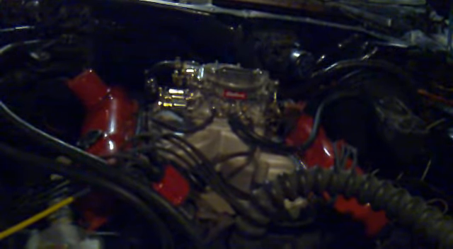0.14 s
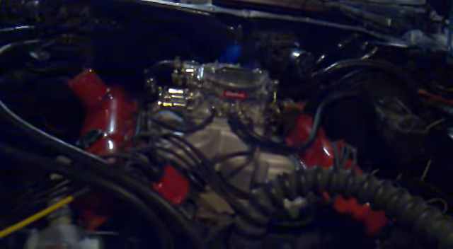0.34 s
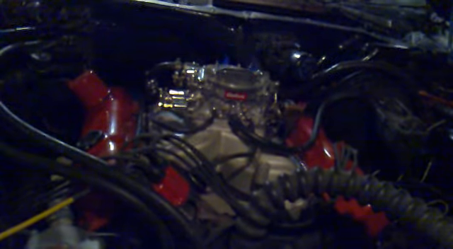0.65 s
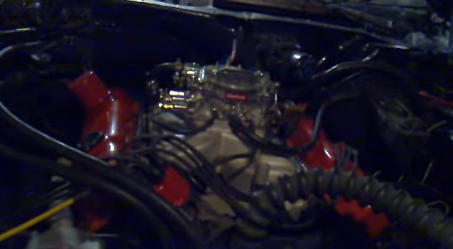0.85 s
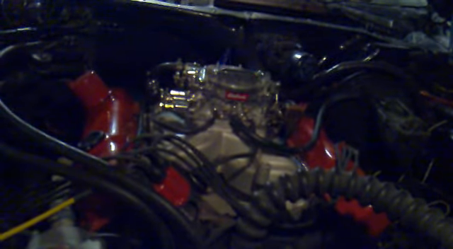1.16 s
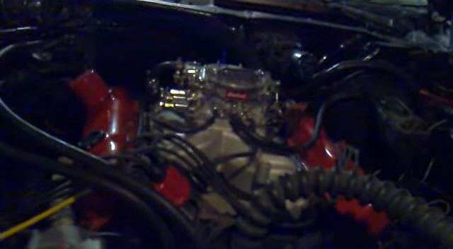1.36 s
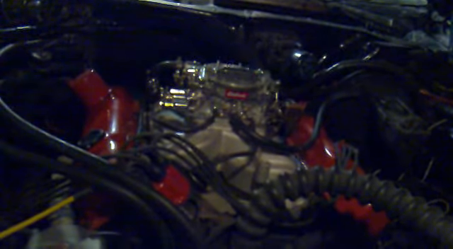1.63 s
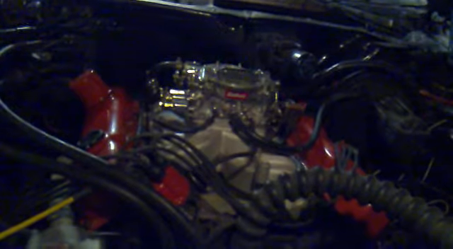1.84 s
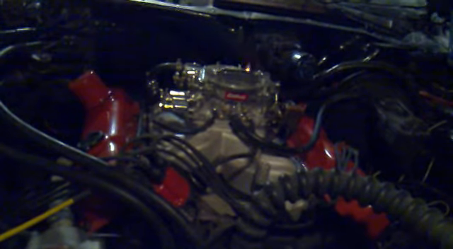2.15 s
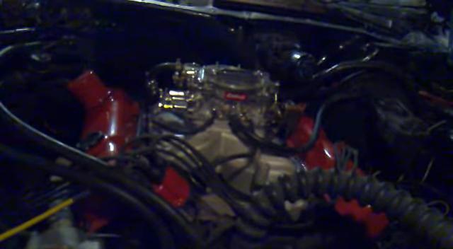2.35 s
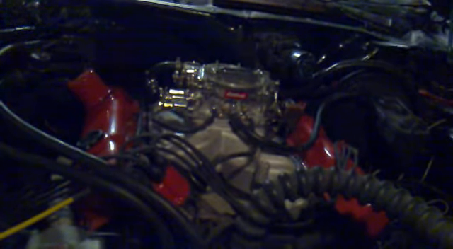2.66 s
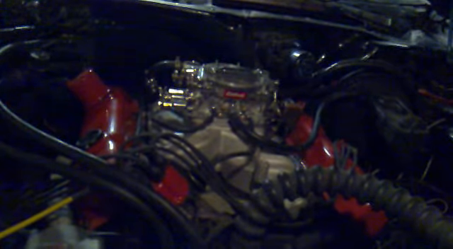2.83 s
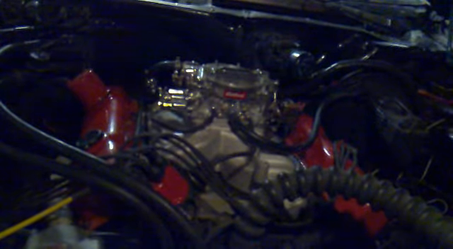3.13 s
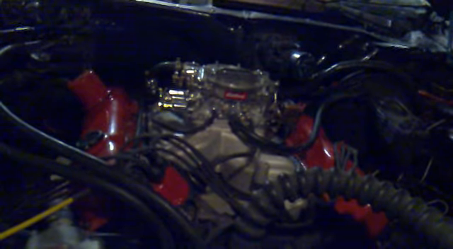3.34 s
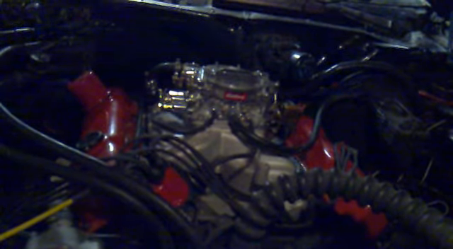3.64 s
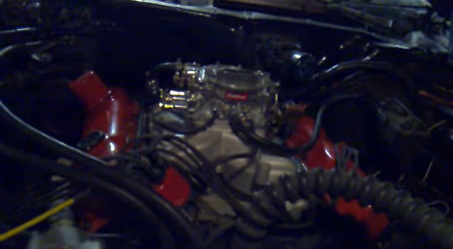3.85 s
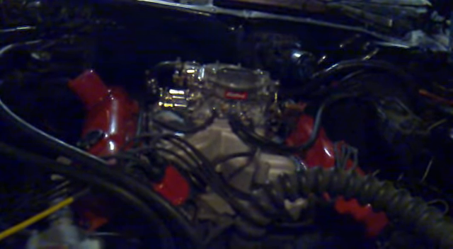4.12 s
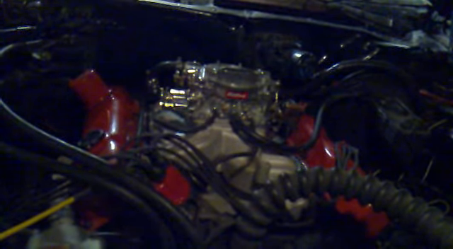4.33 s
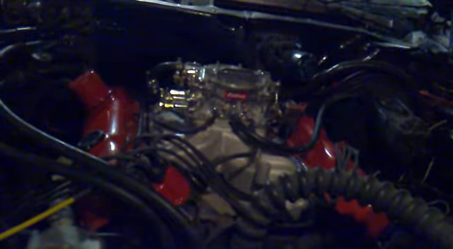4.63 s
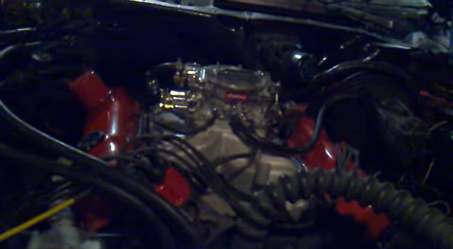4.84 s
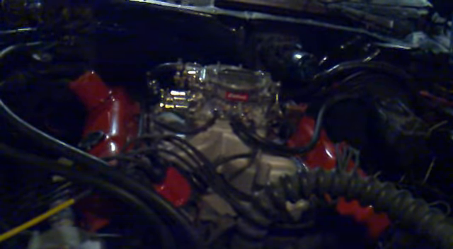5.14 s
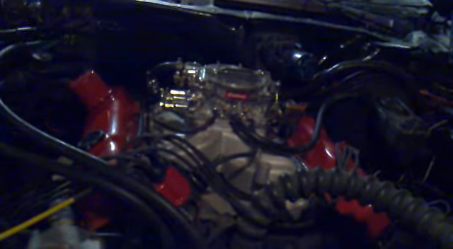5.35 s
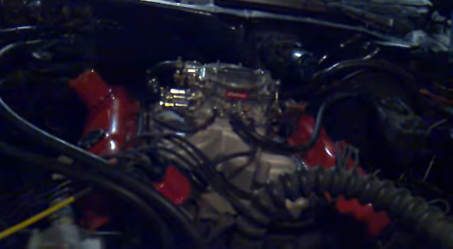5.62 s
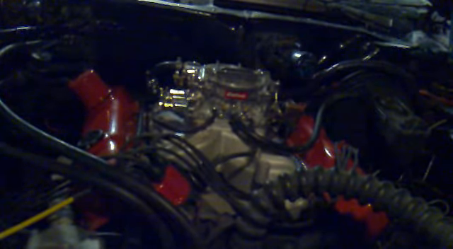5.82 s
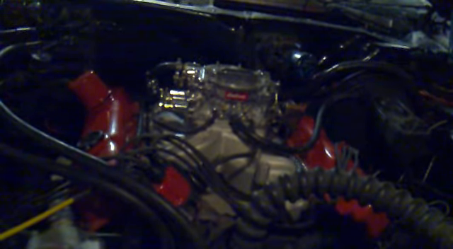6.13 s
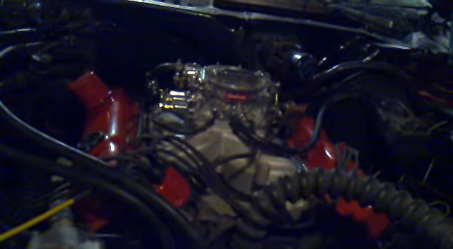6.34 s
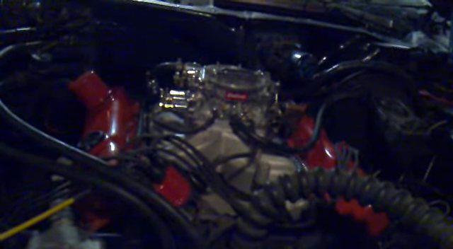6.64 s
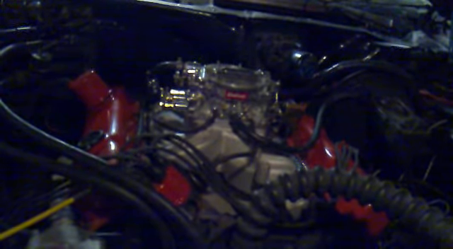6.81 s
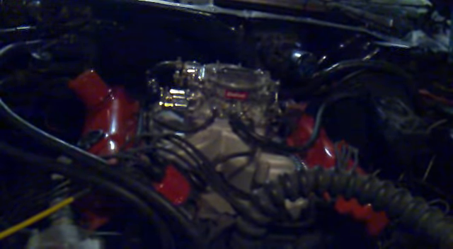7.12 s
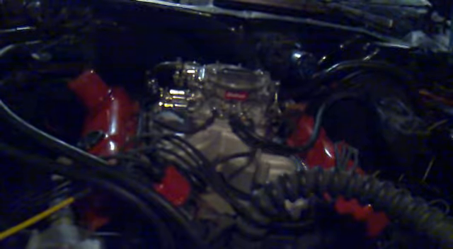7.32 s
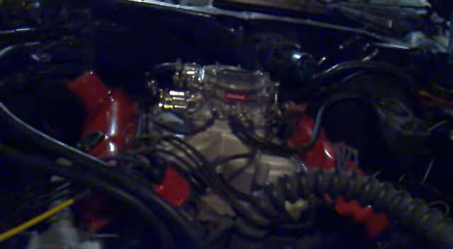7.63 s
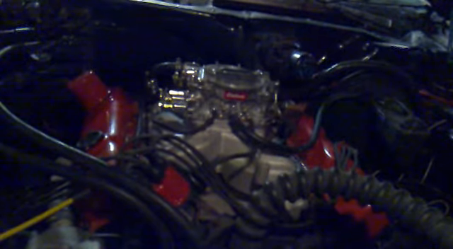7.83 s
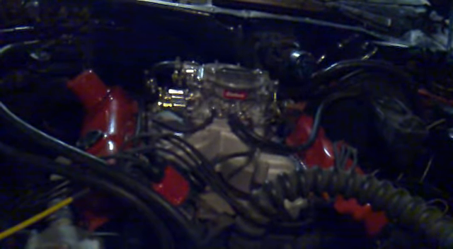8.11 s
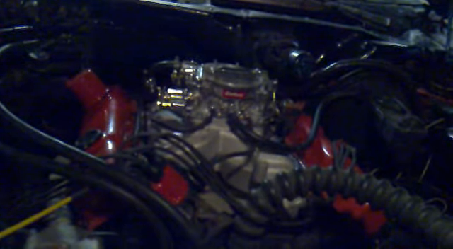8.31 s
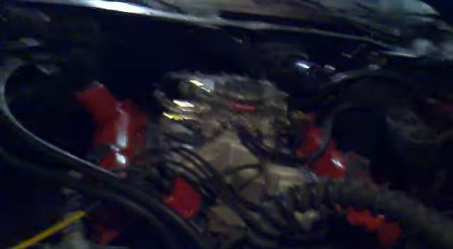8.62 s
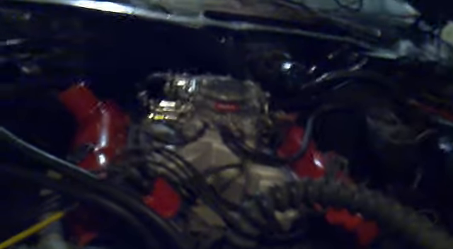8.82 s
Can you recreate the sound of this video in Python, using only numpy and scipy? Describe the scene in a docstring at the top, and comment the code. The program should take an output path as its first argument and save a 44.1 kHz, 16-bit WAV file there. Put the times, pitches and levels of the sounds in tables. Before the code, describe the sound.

A big engine that will not start spits soft fiery puffs and pops, one huge backfire whoosh at two seconds, then weaker hisses and handling clicks.

```python
"""Fuel burning back through the carburetor of a big engine that will not start, in a closed garage.
Puffs and one large whoosh are turbulent noise in bands; ignitions are resonant noise bursts, and
intake air columns sing as narrow-band noise. Pressure jumps thump the room's low standing waves.
At the end a hand shifts on the microphone's plastic case, exciting its damped modes."""
import sys
import numpy as np
from scipy import signal
from scipy.fft import rfft, irfft, next_fast_len
from scipy.io import wavfile
from scipy.ndimage import uniform_filter1d

SR = 44100
rng = np.random.default_rng(int(sys.argv[2]) if len(sys.argv) > 2 else 0)


def waveform_to_disk(signal):
    """Save audio, clipped to [-1, 1], as 16-bit WAV at the path in sys.argv[1]."""
    frames = np.transpose(np.atleast_2d(signal))
    scaled = np.clip(frames, -1, 1) * 32767
    samples = np.round(scaled).astype(np.int16)
    wavfile.write(sys.argv[1], SR, samples)


N = 395577
TIME = np.arange(N) / SR   # s

# puffs of burning gas: start_s, rise_s, hold_s, fade_db_per_s, hiss_db,
# then levels over the hiss: roar_db, sizzle_db, rumble_db, deep_rumble_db
GAS_PUFFS = [(0.001, 0.00089, 0.0059, 250, -54.5, 4.5, -10, 5, -12),
             (0.031, 0.028, 0.086, 122, -67.5, 15.5, -17, 6, 8),
             (0.22, 0.051, .005, 180, -56, 2.5, -11, -13, -17),
             (0.39, 0.047, 0.023, 153, -46.5, -1.5, -6, -9, -25.5),
             (0.556, 0.013, 0.031, 180, -50, -2, -6.5, -14.5, -20),
             (0.625, 0.031, 0.041, 193, -52.5, -7, -6, -29, -15),
             (0.793, .02, 0.043, 128, -59.5, 1.5, -8, -12, -25),
             (1.211, 0.052, 0.022, 170, -58.5, 1, -13, -8, -20),
             (1.37, 0.019, .01, 180, -61, -5, -10, -14, -6),
             (1.414, 0.023, 0.028, 250, -54.5, -3, -4, 9.5, 11),
             (1.574, 0.025, 0.047, 92, -65.5, 3, 1, -12, 0),
             (1.831, 0.049, .005, 240, -54, -5, -11, -27, -18),
             (1.913, 0.044, 0.023, 220, -63, -3, -6, -20, -7),
             (2.021, .017, .02, 100, -33, 0.1, -5.5, -11.5, -16),
             (2.03, 0.037, .02, 149.5, -19, -1, -10.5, -12.5, -16.5),
             (2.085, .025, .02, 300, -19.5, -8.5, -0.53, -10, -12),
             (2.088, 0.03, 0.04, 204, -17.5, 3.5, -9, 1.24, -0.5),
             (2.321, 0.029, .12, 71, -60.5, 1, -0.5, -1, 6),
             (2.536, 0.018, 0.091, 163, -56, -8.5, -3, -12, -5.5),
             (2.954, 0.078, .01, 150, -51, -3, -3, -12.5, -8),
             (3.036, 0.099, 0.018, 140.5, -46, -5, -2, -25, -19.5),
             (3.234, 0.084, 0.048, 190, -57, -4, -2, -13.5, -11),
             (3.692, 0.043, 0.24, 150, -67.5, 0.5, -3.5, -14, -25),
             (3.967, 0.023, 0.017, 122, -32, -11.5, -2.5, -29.5, -40.5),
             (3.994, 0.028, 0.064, 243.5, -29, -14, -5, -32.5, -39.5),
             (4.673, 0.025, 0.1, 200, -69, -4.5, 1, -9.5, -18),
             (4.79, 0.024, 0.11, 150, -60, -8.5, 0.5, -13, -25.5),
             (4.856, 0.08, 0.026, 191, -55.5, -20.5, -3.5, -27.5, -33),
             (5.355, 0.047, 0.023, 152.5, -52, 1, -4, -16, -30),
             (5.855, 0.032, 0.048, 151, -53.5, -10, 1.5, -21, -27),
             (5.916, 0.021, 0.0078, 302, -44.5, -0.5, -6, -21, -21.5),
             (5.969, 0.016, 0.069, 220, -51, -14, -1.5, -23, -33),
             (6.385, 0.03, 0.027, 171, -64.5, -5, -9.5, -31, -29.5),
             (6.494, 0.018, 0.071, 98.5, -67.5, -11, -6.5, -22, -24.5),
             (6.604, 0.051, .005, 151, -67.5, -12, 2, -21.5, -12),
             (6.705, 0.041, 0.0087, 215, -48, 1.5, 0.5, -4.5, -19),
             (6.821, 0.028, 0.0096, 221, -58, -1, -7.5, -11, -17.5),
             (7.077, 0.04, 0.12, 150, -70.5, -2, -2, -20, -18.5),
             (7.266, 0.036, .005, 281, -61.5, -4.5, -1.5, -30, -35),
             (7.531, 0.026, 0.053, 200, -55, -4, -5, -17, -35.5),
             (7.598, 0.03, 0.0043, 269, -45, -3.5, -8, -26, -39.5)]
RISE_DB = 31   # a puff climbs this far during its rise
ROAR_PACE, SIZZLE_PACE = 0.9, 1.05   # fading speed of each range as a share of the hiss's
RUMBLE_PACE, DEEP_PACE = 0.58, 0.49   # the bass lingers
# small flame that keeps burning between puffs: time_s, hiss_db, rumble_db, deep_rumble_db
STANDING_FLAME = [(0, -61, -67, -50.5), (.39, -65.5, -71, -74), (.78, -72, -87, -78),
                  (1.0, -80, -74.5, -82), (1.2, -75.5, -85, -74), (1.5, -67.5, -79, -60),
                  (2.0, -69, -80, -74.5), (2.65, -66, -81, -70.5), (2.85, -76, -78, -85.5),
                  (3.1, -71.5, -76, -62), (3.55, -73, -85.5, -94.5), (4.4, -75, -85, -97),
                  (5.3, -76, -89, -94), (6.2, -75.5, -88, -94.5), (7.0, -77.5, -88, -87.5),
                  (7.8, -81.5, -98, -98.5), (8.1, -82.5, -92, -91), (8.4, -90, -94, -84)]
FLAME_ROAR_DB, FLAME_SIZZLE_DB = -1.9, -6.5   # over its hiss
# relative spectra of the three ranges of turbulent flow: frequency_hz, density_db (per Hz)
ROAR_SPECTRUM = [(150, -21), (220, -6), (320, -1.5), (450, -2.5), (650, -4), (900, -10.5), (1300, -18)]
HISS_SPECTRUM = [(600, -7), (950, -1), (1350, 3), (2000, 0.5), (3200, 0), (4500, -5.5), (6000, -24.5)]
SIZZLE_SPECTRUM = [(3500, -17.5), (4800, -0.5), (6500, -1.5), (8000, -5.5), (11000, -10.5), (16000, -19.5)]
# low standing waves of the garage: frequency_hz, level_db, t60_s
STANDING_WAVES = [(28.2, -9.5, 1), (44.32, -8.5, 0.33), (74.58, -3, 0.89), (83, 2.5, 0.17), (115, -3, 0.45),
                  (151.6, -4, 0.48), (197, -4, 0.26)]
GARAGE_T60_S, GARAGE_DB, WALL_CUT_HZ = 0.39, -22.5, 5100   # loop decay without wall loss, echo, corner
# relative spectrum of room tone and microphone hiss: frequency_hz, density_db (per Hz)
FLOOR_SPECTRUM = [(15, -44.5), (25, -4.5), (108, -5.5), (134, -14.5), (200, -10), (326, -7.5), (1190, -10),
                  (1650, -11.5), (2610, -12), (16000, -15)]
FLOOR_DB = -69.5   # rms
# pressure jumps in the manifold: centre_s, peak_db, length_s
PRESSURE_JUMPS = [(0.056, -44, 0.018), (1.4434, -36.5, .012), (1.4537, -31.5, .012), (1.515, -47, 0.013),
                  (2.126, -10, 0.0094), (2.15, -10.5, .010), (2.161, -11.5, 0.012), (2.202, -21, 0.0098),
                  (6.73, -48, 0.013), (6.739, -44, 0.01), (6.772, -43.5, 0.012)]
BOOM_DB, ROOM_RING_DB = -21.5, -66   # drive of the two strongest standing waves, and of all of them
# air columns in the intake that sing while gas passes:
# start_s, length_s, pitch_hz, width_hz (of each of two passes), level_db
AIR_COLUMNS = [(0.085, 0.24, 288, 110, -56), (0.23, 0.077, 438, 23, -51.5), (0.443, 0.064, 1950, 440, -44),
               (0.81, 0.073, 637, 24, -52.5), (2.068, 0.023, 318, 80, -20), (2.131, 0.019, 332, 43, -4),
               (2.156, .025, 292, 90, -4), (2.088, 0.048, 3240, 400, -47), (3.273, 0.09, 2984, 260, -60),
               (3.99, 0.15, 3325, 26.4, -32.5), (4.046, 0.068, 3310, 10, -32), (4.107, 0.1, 3284, 14, -51),
               (4.002, 0.04, 2063, 49, -35), (4.049, 0.14, 1258, 98, -43), (4.904, 0.08, 1995, 280, -60),
               (5.352, 0.028, 499, 94, -49), (6.74, 0.082, 737, 116, -45.5),
               (7.606, 0.073, 1375, 305, -46.5), (5.856, 0.024, 994, 530, -55.5),
               (8.134, .05, 1599, 140, -72.5)]
# sudden ignitions: start_s, level_db (before a common trim), centre_hz, t60_s,
# width (share of centre, first pass), crack_db (over level_db)
IGNITIONS = [(0.419, -36.5, 424, 0.062, 0.99, 3), (0.575, -34, 400, 0.47, 1, -19),
             (0.814, -41.5, 634, 0.12, 0.63, -23), (1.276, -31.5, 2800, 0.22, 0.63, -14),
             (1.434, -40, 2250, 0.22, 0.34, -22), (1.869, -47, 301, 0.12, 0.7, -14),
             (2.034, -15.5, 595, 0.54, 0.55, -5.5), (2.116, 1, 312, 0.14, 0.4, -18),
             (2.564, -38, 845, 0.18, 0.24, -12), (2.614, -48, 396, 0.097, 0.85, -2.5),
             (3.032, -32, 1100, 0.16, 0.4, -17), (3.149, -34.5, 650, 0.36, 0.51, -11),
             (3.264, -38, 283.3, 0.15, 0.41, -14), (3.988, -21.5, 3420, 0.17, 0.25, -5.5),
             (4.699, -49, 609, 0.12, 0.82, -9), (4.799, -37.5, 358, 0.11, 0.29, -13.5),
             (5.361, -38.5, 502, 0.14, 0.79, -4), (5.395, -33, 746, 0.089, 0.39, -12),
             (5.86, -37.5, 674, 0.2, 0.56, -16), (5.941, -23, 2280, 0.21, 0.53, -14.5),
             (6.148, -43.5, 315, 0.13, 0.77, -9), (6.399, -52, 955, 0.095, 0.58, -14.5),
             (6.718, -37.5, 402, 0.15, 0.76, -3), (7.089, -46.5, 750, 0.14, 0.4, -17.5),
             (7.289, -53.5, 446, 0.13, 0.86, -11), (7.555, -42, 2710, 0.1, 0.43, -15),
             (7.628, -27.5, 1450, 0.21, 0.56, -20)]
# fingers on the case: start_s, level_db (before a common trim), centre_hz, fall_db_per_octave
FINGER_TOUCHES = [(8.591, -42, 3190, 12), (8.611, -48, 664, 16.5), (8.6122, -46, 6040, 9.5),
                  (8.648, -45.5, 897, 8), (8.7108, -30.5, 2010, 24.5), (8.71, -31.5, 4460, 11),
                  (8.7212, -36.5, 1886, 8.5), (8.828, -42.5, 5800, 16), (8.8572, -22.5, 3490, 10),
                  (8.8579, -22.5, 8150, 20), (8.8692, -47, 895, 0.5), (8.8729, -46, 700, 4.5),
                  (8.892, -50, 2520, 4.5), (8.8959, -36, 2180, 10.5), (8.897, -34.5, 600, 15),
                  (8.9195, -37.5, 6400, 17), (8.92, -39, 1760, 11.5)]
# modes of the plastic case: frequency_hz, level_db, t60_s
SHELL_MODES = [(602, -2.5, 0.02), (1663, 0, 0.01), (2010, -1.5, 0.008), (2930, 5, 0.0043), (3870, -2, 0.01),
               (4970, 2.5, 0.0038), (6300, -1, 0.0056), (7520, 5.5, 0.0041), (10170, 14.5, 0.0029)]
# the hand jolts the microphone: centre_s, level_db (before the envelope), period_s, direction (+1 or -1)
JOLTS = [(8.726, -58.5, 0.028, 1), (8.899, -59, 0.013, -1)]
# skin slides on the case: start_s, length_s, level_db
SKIN_RUBS = [(8.738, .05, -68), (8.845, 0.034, -60), (8.89, 0.054, -64.5)]
CEILING, OFFSET, CUTOFF_HZ = 0.71, -0.0005, 15750   # overload level, shift off zero, top of the band


def from_db(db):
    """Decibel law: 20 dB is a factor of ten in amplitude."""
    return 10 ** (np.asarray(db) / 20)


def rms_one(x):
    """Normalization to unit root-mean-square amplitude."""
    return x / np.sqrt(np.mean(x ** 2) + 1e-20)


def drift(rate_hz):
    """Low-pass random process: noise through two equal one-pole filters, spread 1."""
    r = np.exp(-2 * np.pi * rate_hz / SR)
    slow = signal.lfilter([1], [1, -2 * r, r * r], rng.standard_normal(N + SR))
    return rms_one(slow[SR:])   # the first second lets the filter settle


def coloured(spectrum):
    """Spectral shaping: white noise weighted in the frequency domain, rms 1."""
    hz, db = np.transpose(spectrum)
    grid_hz = np.maximum(np.arange(N // 2 + 1) * SR / N, 1)
    gain = from_db(np.interp(np.log(grid_hz), np.log(hz), db, left=-80, right=-80))
    return rms_one(irfft(rfft(rng.standard_normal(N)) * gain, N))


def resonance(x, hz, width_hz):
    """Resonance: a two-pole band-pass with gain 1 at its peak."""
    r = np.exp(-np.pi * width_hz / SR)
    feedback = [1, -2 * r * np.cos(2 * np.pi * hz / SR), r * r]
    return signal.lfilter([(1 - r * r) / 2, 0, (r * r - 1) / 2], feedback, x)


def ring(x, hz, t60_s):
    """Damped free vibration: a unit click starts a decaying sine of initial height 1."""
    r = from_db(-60 / (t60_s * SR))
    w = 2 * np.pi * hz / SR
    return signal.lfilter([0, np.sin(w)], [1, -2 * r * np.cos(w), r * r], x + 1e-18)


def evened(x, seconds):
    """Power normalization: divides out the chance swell of narrow noise over a short window."""
    return x / np.sqrt(uniform_filter1d(x ** 2, int(seconds * SR)) + 1e-20)


def eddies(x, patchy_db, rate_hz):
    """Turbulent intermittency: narrow neighbouring bands swell each at their own moments."""
    total = np.zeros(N)
    for k, hz in enumerate(np.geomspace(200, 15500, 55)):
        swell = from_db(patchy_db * drift(rate_hz))
        total += (-1) ** k * swell * resonance(x, hz, 0.085 * hz)
    return rms_one(total)


def room_modes(x, modes=STANDING_WAVES):
    """Modal superposition: the garage's low standing waves, signs alternating."""
    return sum((-1) ** k * from_db(db) * ring(x, hz, t60_s) for k, (hz, db, t60_s) in enumerate(modes))


def puffing(peak_db, flame_db, pace):
    """Addition of powers: every puff rises, holds and fades over the standing flame."""
    steps = TIME[::32]   # a coarse time grid suffices for the slow gain
    start_s, rise_s, hold_s, fade_db_s = np.transpose(GAS_PUFFS)[:4, :, None]
    age = steps - start_s
    climb_db = RISE_DB * np.minimum(age / np.maximum(rise_s, 1e-3) - 1, 0)
    fall_db = pace * fade_db_s * np.maximum(age - rise_s - hold_s, 0)
    puff_power = np.sum(from_db(2 * (peak_db[:, None] + climb_db - fall_db)), axis=0)
    flame_power = from_db(2 * np.interp(steps, np.transpose(STANDING_FLAME)[0], flame_db))
    return np.interp(TIME, steps, np.sqrt(puff_power + flame_power))


def gas():
    """Turbulent flow noise: three ranges share a flutter, above a rumble that excites room modes."""
    hiss_db, roar_db, sizzle_db, rumble_db, deep_db = np.transpose(GAS_PUFFS)[4:]
    flame_db, flame_rumble_db, flame_deep_db = np.transpose(STANDING_FLAME)[1:]
    flutter = drift(52)

    roar_eddies = eddies(coloured(ROAR_SPECTRUM), patchy_db=2.5, rate_hz=7.8)
    roar = from_db(1.5 * flutter) * evened(roar_eddies, 0.21)
    hiss_eddies = eddies(coloured(HISS_SPECTRUM), patchy_db=1.4, rate_hz=25.0)
    hiss = from_db(1.1 * flutter) * evened(hiss_eddies, 0.05)
    sizzle_eddies = eddies(coloured(SIZZLE_SPECTRUM), patchy_db=1.5, rate_hz=27.0)
    sizzle_noise = 0.52 * coloured(SIZZLE_SPECTRUM) + 0.73 * sizzle_eddies
    sizzle = from_db(0.53 * flutter + 0.37 * drift(200)) * sizzle_noise
    rush = (roar * puffing(hiss_db + roar_db, flame_db + FLAME_ROAR_DB, ROAR_PACE)
            + hiss * puffing(hiss_db, flame_db, 1)
            + sizzle * puffing(hiss_db + sizzle_db, flame_db + FLAME_SIZZLE_DB, SIZZLE_PACE))

    upper_modes = room_modes(rng.standard_normal(N), STANDING_WAVES[2:])
    rumble = from_db(2.5 * drift(25)) * evened(upper_modes, 0.015)
    deep = evened(room_modes(rng.standard_normal(N), STANDING_WAVES[:2]), 0.031)
    low = (rumble * puffing(hiss_db + rumble_db, flame_rumble_db, RUMBLE_PACE)
           + deep * puffing(hiss_db + deep_db, flame_deep_db, DEEP_PACE))
    return rush, low


def garage(x):
    """Reverberation: ten feedback delays, duller on every round."""
    size = next_fast_len(N + SR)   # a spare second keeps the tail from wrapping round
    w = 2 * np.pi * np.arange(size // 2 + 1) / size
    dull = 1 / (1 + 1j * w * SR / (2 * np.pi * WALL_CUT_HZ))
    tail = 0
    for k, lag_s in enumerate(np.geomspace(0.013, 0.041, 10)):
        delay = np.exp(-1j * w * round(lag_s * SR))
        loop = from_db(-60 * lag_s / GARAGE_T60_S) * dull * delay
        tail = tail + (-1) ** k * loop / (1 - loop)   # all rounds summed
    return irfft(rfft(x, size) * tail, size)[:N]


def background():
    """Stationary noise: room tone and microphone hiss with one fixed spectrum."""
    return from_db(FLOOR_DB) * coloured(FLOOR_SPECTRUM)


def thumps():
    """Impulsive excitation: a push of air between two sucks sets the room modes ringing."""
    push = np.zeros(N)
    for centre_s, peak_db, length_s in PRESSURE_JUMPS:
        u = (2.9 * (TIME - centre_s) / length_s) ** 2
        push += from_db(peak_db) * (1 - 2 * u) * np.exp(-u)
    change = np.gradient(push)   # the boom is driven by the change of pressure
    boom = sum(from_db(db) * ring(change, hz, t60_s) for hz, db, t60_s in STANDING_WAVES[2:4])
    return push + from_db(BOOM_DB) * boom + from_db(ROOM_RING_DB) * room_modes(push)


def whistles():
    """Air-column resonance: flow noise passes a narrow band twice, swells fast and fades slowly."""
    out, size = np.zeros(N), SR // 2
    t = np.arange(size) / SR
    noise = rng.standard_normal((len(AIR_COLUMNS), 2 * size))
    for (start_s, length_s, hz, width_hz, level_db), white in zip(AIR_COLUMNS, noise):
        narrow = resonance(resonance(white, hz, width_hz), hz, width_hz)
        tone = evened(narrow, 0.031)[size:]   # the first half lets the resonance build up
        swell = np.sin(np.pi * np.clip(t / length_s, 0, 1) ** 0.65)
        at = round(start_s * SR)
        out[at:at + size] += from_db(level_db) * tone * swell
    return out


def pops():
    """Transient combustion: bursts at the pitch of the passage each fires in, with a bright crack."""
    out, size = np.zeros(N), SR // 4
    t = np.arange(size) / SR
    rise = 1 - np.exp(-t / 0.0012)
    noise = rng.standard_normal((len(IGNITIONS), 2, size))
    for (start_s, level_db, hz, t60_s, width, crack_db), white in zip(IGNITIONS, noise):
        tone = resonance(resonance(white[0], hz, width * hz), hz, 2 * width * hz)
        body = from_db(-60 * t / t60_s) * evened(tone, 0.0061)
        bright = rms_one(resonance(white[1], 4500, 7000))
        crack = from_db(crack_db - 60 * t / 0.057) * bright
        at = round(start_s * SR)
        out[at:at + size] += from_db(level_db - 11.5) * rise * (body + crack)
    return out


def touches():
    """Modal excitation: each touch strikes the case modes nearest its own centre hardest."""
    out = np.zeros(N)
    start_s, touch_db, centre_hz, fall_db = np.transpose(FINGER_TOUCHES)
    at = np.round(start_s * SR).astype(int)
    scatter = rng.standard_normal((len(at), len(SHELL_MODES)))
    for k, (hz, mode_db, t60_s) in enumerate(SHELL_MODES):
        clicks = np.zeros(N)
        octaves = np.abs(np.log2(hz / centre_hz))
        clicks[at] = from_db(touch_db + mode_db - 3.5 - fall_db * octaves + 2.66 * scatter[:, k])
        contact = uniform_filter1d(clicks, size=4, origin=-2) * 1.34   # a soft contact
        out += (-1) ** k * ring(contact, hz, t60_s)
    return signal.lfilter(*signal.butter(1, 250, "high", fs=SR), out)   # a small shell radiates no bass


def jolts():
    """Inertial displacement: each jolt of the microphone is one slow swing under a bell envelope."""
    out = np.zeros(N)
    for centre_s, level_db, period_s, direction in JOLTS:
        u = (TIME - centre_s) / period_s
        out += direction * from_db(level_db) * np.sin(2 * np.pi * u) * np.exp(-1.6 * u ** 2)
    return out


def rubs():
    """Sliding friction: skin on the case gives band-limited hiss that swells and fades."""
    out = np.zeros(N)
    skin = rms_one(resonance(resonance(rng.standard_normal(N), 3100, 3000), 3200, 3000))
    for start_s, length_s, level_db in SKIN_RUBS:
        swell = np.sin(np.pi * np.clip((TIME - start_s) / length_s, 0, 1))
        out += from_db(level_db) * swell * skin
    return out


def gain_control(x, threshold_db, share, release_db_s, attack_s):
    """Dynamic compression: after a loud sound the gain sinks slowly and then creeps back."""
    level_db = 10 * np.log10(uniform_filter1d(x ** 2, size=882) + 1e-12)   # 20 ms power
    # peak hold that falls at the release rate
    held_db = np.maximum.accumulate(level_db + release_db_s * TIME, axis=-1) - release_db_s * TIME
    wanted_cut_db = share * np.maximum(held_db - threshold_db, 0)
    r = np.exp(-1 / (attack_s * SR))
    return x * from_db(-signal.lfilter([1 - r], [1, -r], wanted_cut_db))


def scene():
    """Linear superposition: engine and its echo, room-mode bass, hand and background; one channel."""
    rush, rumble = gas()
    engine = rush + pops() + whistles()
    echo = from_db(GARAGE_DB) * garage(engine)
    hand = touches() + jolts() + rubs()
    return (engine + echo + rumble + thumps() + hand + background())[None]


def record(dry):
    """Saturation: gain control, then an almost flat overload, loss of the top and a shift off zero."""
    levelled = gain_control(dry, threshold_db=-28.5, share=0.31, release_db_s=20.5, attack_s=0.38)
    clipped = levelled / (1 + np.abs(levelled / CEILING) ** 8) ** (1 / 8)
    low_pass = signal.ellip(12, 0.5, 70, CUTOFF_HZ, fs=SR, output="sos")
    return signal.sosfilt(low_pass, clipped) + OFFSET


dry = scene()
out = record(dry)
waveform_to_disk(out)
```